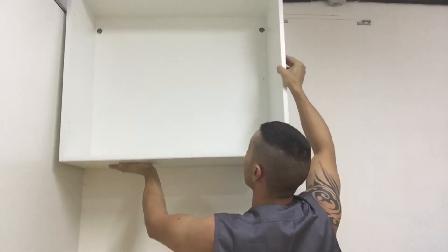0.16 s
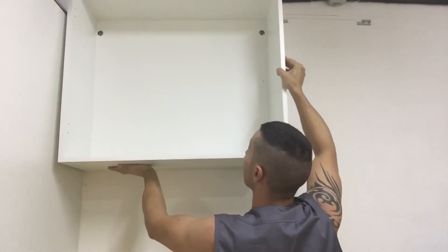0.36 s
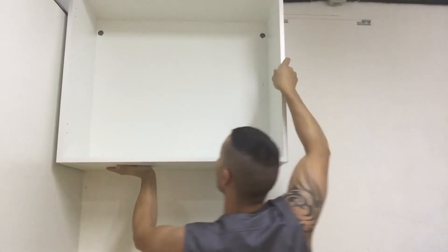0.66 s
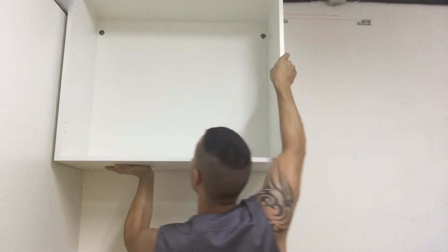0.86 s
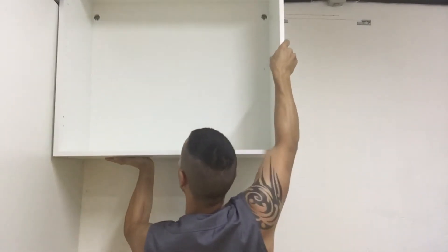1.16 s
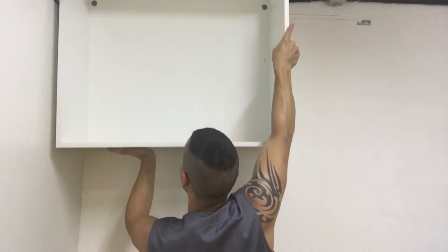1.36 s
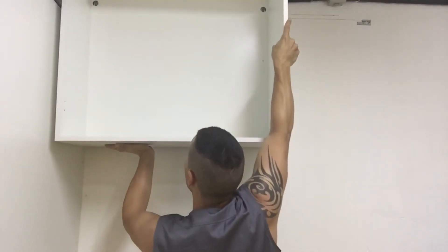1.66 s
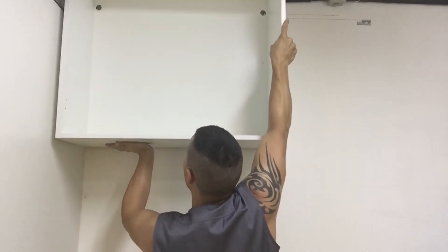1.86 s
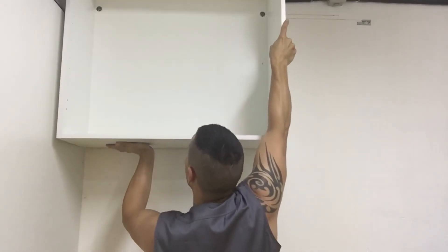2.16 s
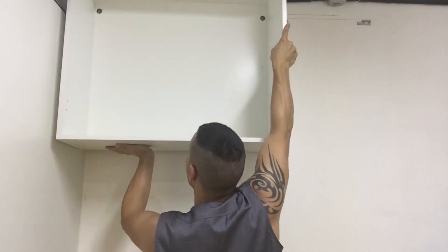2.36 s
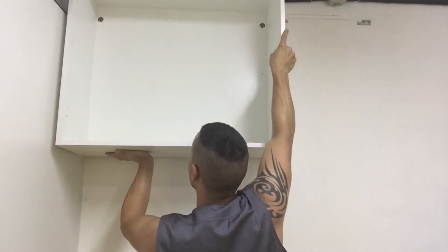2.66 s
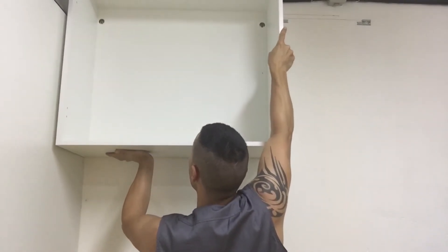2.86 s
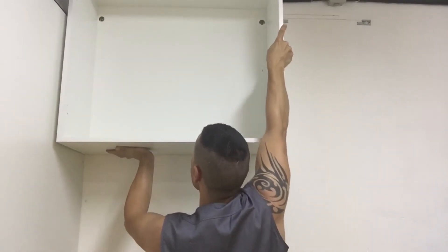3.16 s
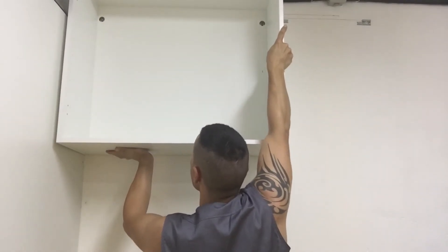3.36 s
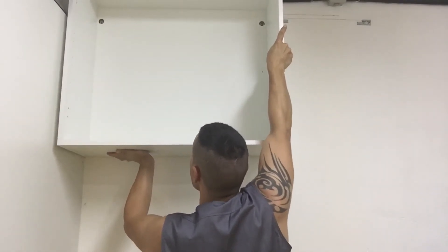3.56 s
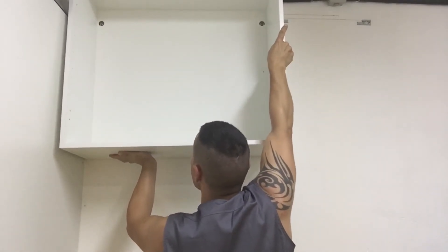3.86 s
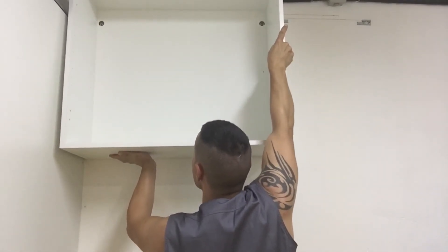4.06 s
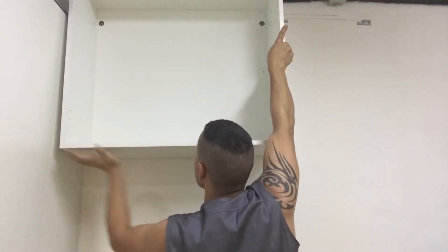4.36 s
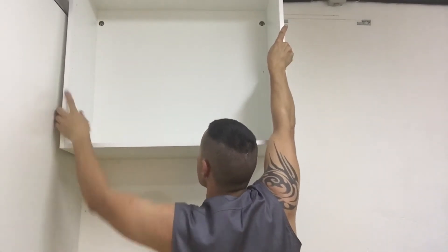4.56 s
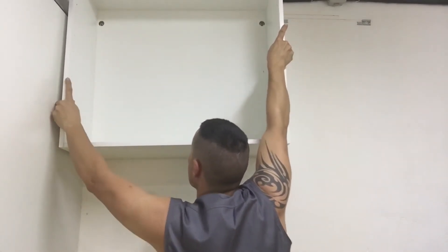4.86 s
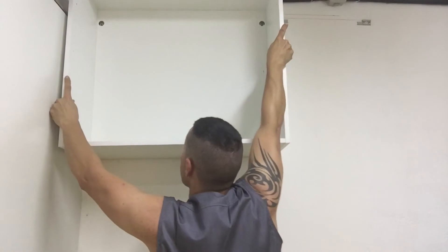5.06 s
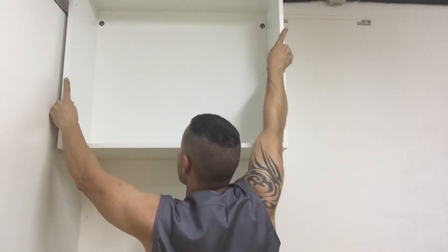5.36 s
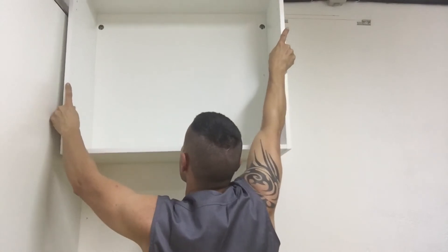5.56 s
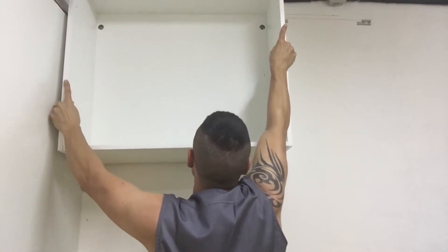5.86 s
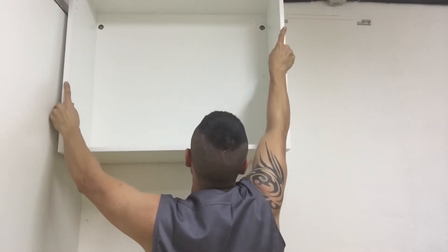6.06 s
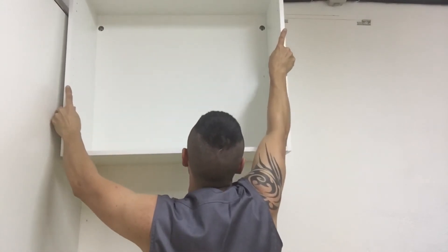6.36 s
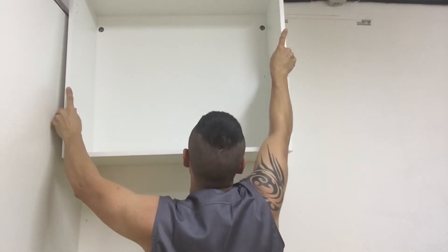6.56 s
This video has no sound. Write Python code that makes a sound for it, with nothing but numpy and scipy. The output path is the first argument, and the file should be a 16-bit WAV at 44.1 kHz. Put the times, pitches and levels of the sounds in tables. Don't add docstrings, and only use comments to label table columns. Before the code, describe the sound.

Irregular wooden knocks boom through an empty cabinet being worked onto its wall mounts, with brief scrapes, tiny metal clinks and faint fan hum between.

```python
import sys
import numpy as np
from scipy import signal
from scipy.fft import rfft, irfft
from scipy.io import wavfile
from scipy.ndimage import uniform_filter1d

SR = 44100
rng = np.random.default_rng(int(sys.argv[2]) if len(sys.argv) > 2 else 0)


def put_to_file(sound):
    columns = np.atleast_2d(sound).T
    safe = np.clip(columns, -1, 1)
    whole_steps = np.round(safe * 32767)
    wavfile.write(sys.argv[1], SR, whole_steps.astype(np.int16))


def natural_amplitude(level_db):
    exponent = np.asarray(level_db, float) / 20
    return 10 ** exponent


N = 296793

# pitch_hz, level_db, t60_s
WALL_MODES = [(51.7, -18, 0.24), (60.6, 9, 0.37)]
BACK_MODES = [(101.8, 0.96, 0.18), (129.4, 0.67, 0.33), (160, -0.24, 0.22)]
SIDE_MODES = [(185.7, -3, 0.12), (210.9, -3, 0.18), (240, -4.5, 0.12)]
BOX_MODES = [(272.3, -6, 0.16), (318.5, 0, 0.16), (358.6, -7, 0.15), (417.4, -10, 0.14)]
RISE_TIMES = [0.025, 0.0038, 0.0054, 0.0023]
# start_s, cabinet_db, wall_db, spot_turns (round the frame)
KNOCKS = [(0.0, -27, -49, 0.14), (0.064, -12, -23, 0.57), (0.129, -19.5, -23, 0.77),
          (0.209, -20.5, -24.5, .33), (0.695, -19, -25.5, 0.41), (1.423, -22, -24, .1),
          (1.469, -27.5, -23, 0.033), (1.898, -16, -24.5, 0.4), (1.929, -17, -43, 0.25),
          (1.969, -19.5, -28, 0.5), (2.668, -11.5, -33, 0.54), (2.698, -25.5, -27, 0.49),
          (2.752, -27, -48, 0.72), (2.975, -23, -27.5, 0.25), (3.806, -28, -40, 0.16),
          (5.187, -23.5, -39, 0.16), (5.259, -28, -31, 0.45), (5.374, -16, -39, 0.7),
          (5.488, -24.5, -36.5, 0.4), (5.521, -27.5, -38, 0.89), (6.136, -17, -29, 0.67),
          (6.27, -40, -45, 0.59)]
# start_s, cabinet_db, wall_db, spot_turns
NUDGES = [(0.581, -42, -48, 0.77), (0.779, -35, -63, 0.34), (1.059, -39.5, -50, 0.53),
          (1.833, -51, -69, .02), (2.274, -39.5, -71, 0.87), (2.343, -35.5, -35, 0.22),
          (2.899, -35, -49, 0.71), (3.03, -58, -69, .02), (3.198, -47.5, -64, .01), (3.352, -71, -64, 0.42),
          (3.472, -35, -45, 0.068), (3.537, -38.5, -41, 1), (3.609, -41.5, -43, 0.14),
          (3.87, -42, -44, 0.67), (4.521, -49, -56, 0.33), (4.68, -46, -47, 0.9), (4.829, -45.5, -57, 0.92),
          (5.048, -46, -48.5, 0.29), (5.721, -37.5, -37, 0.18), (5.953, -43.5, -41.5, .92),
          (6.448, -39.5, -42.5, 0.89), (6.52, -48, -58, 0.68)]
# start_s, level_db, mid_share_db, high_share_db, contact_ms
CRACKS = [(0.0, -23, -11.5, -13, 2.7), (0.055, -5, -8, -18, 3), (0.084, -11, -35, -32, 3.5),
          (0.679, -24.5, -7, -19.5, 11.7), (1.417, -19.5, -4.5, -22.5, 1.33),
          (1.89, -17.5, -10, -19.5, 5.7), (1.915, -12.5, -17, -26, 14), (2.262, -36.5, -7, -23, 16),
          (2.664, -12, -9, -13.5, 4.7), (2.722, -11.5, -10.5, -25, 15.3), (2.98, -33, -14, -18.5, 8),
          (3.022, -32.5, -0.5, -23, 10), (3.537, -34.5, -3, -14, 6.8), (3.565, -35, -2, -33, 18),
          (3.606, -31, -6, -23, 3.1), (3.796, -29.5, -7.5, -18, 9.1), (5.18, -28.5, -8, -25, 6),
          (5.256, -22.5, -9.5, -17.5, 5.8), (5.284, -29, -4, -12.5, 5.4), (5.349, -27.5, -4, -7, 1.1),
          (5.38, -19, -22, -24, 7), (5.479, -29.5, 0, -9, 6.9), (6.131, -20.5, -8, -23, 3.3),
          (6.142, -19.5, -41, -22, 2.8)]
# start_s, level_db, mid_share_db, high_share_db, contact_ms
SCUFFS = [(0.555, -34.5, -8.5, -16, 22), (0.617, -55, 3, 11, 5), (1.054, -37, -8.5, -23, 13),
          (1.82, -41.5, 1, -16, 44), (2.51, -38.5, -10, -26, 14), (3.205, -61.5, -18, -0.5, 8),
          (3.404, -50, 7, -34, 2), (3.46, -40, -11, -27, 8), (4.169, -56.5, -6, -7, 22),
          (4.327, -54.5, 5, 0, 2.5), (4.49, -47, 0, -18, 16), (4.53, -47, -3, -11, 27),
          (4.686, -43.5, 9, -15, 12), (4.886, -62, -3, 11.5, 10), (4.91, -76, -8, 16, 12),
          (5.048, -38.5, -14, -22.5, 3), (5.515, -37.5, -3, -20, 8), (5.95, -58.5, -14, -4.5, 4.5),
          (6.385, -43.5, -22, -37, 22), (6.44, -39, -4, -33, 18.3)]
# pitch_hz, width_hz, level_db
BOARD_MODES = [(432, 12, 10.5), (570, 26, 9), (700, 56, 1.5), (830, 44, 5), (962, 17, 0), (1076, 65, 4.5),
               (1270, 25, -0.5), (1420, 78, -3), (1630, 27, 9), (2080, 22, -23), (2290, 88, -2),
               (3060, 170, -3.5), (3430, 110, -2)]
# start_s, pressure_db, sliding_db
DRAG = [(0.0, -17, -62), (0.3, -23, -56), (0.42, -37.5, -56), (0.67, -34.5, -40), (0.9, -38.5, -67),
        (1.5, -46, -50.5), (1.93, -45, -48.5), (2.1, -53, -62.5), (2.58, -42, -46.5), (2.72, -24, -35),
        (2.94, -40, -47.5), (3.26, -53.5, -55.5), (3.6, -37, -55), (4.05, -52, -58.5), (5.16, -47.5, -56.5),
        (5.38, -27.5, -36.5), (5.8, -49.5, -52), (6.73, -49.5, -58.5)]
# start_s, level_db, pitch_hz, t60_s
FITTINGS = [(0.0557, -20.5, 2490, .03), (0.056, -19, 3450, 0.027), (0.062, -18.5, 1215, 0.12),
            (1.416, -26, 1382, 0.049), (1.4185, -34, 1960, 0.042), (1.419, -31.5, 2480, .035),
            (1.4194, -29, 3180, 0.029), (1.846, -54, 3520, 0.21), (2.665, -32, 3930, 0.032),
            (3.031, -36.5, 897, .065), (3.0328, -38, 1690, .075), (3.408, -52, 842, 0.26),
            (3.612, -47.5, 5750, .035), (3.814, -49, 4340, .11), (3.861, -59, 5900, .14),
            (4.6847, -47.5, 970, 0.088), (4.687, -42, 1905, .11), (4.688, -54.5, 5200, .055),
            (4.689, -57, 6900, .085), (4.6895, -44, 2680, .045), (5.0465, -52, 2330, .065),
            (5.0485, -47, 1585, .075), (5.288, -32, 2150, .025), (5.3495, -28.5, 6150, 0.027),
            (5.3515, -37, 3720, .025), (5.483, -38, 2680, 0.051), (5.486, -53.5, 6860, .28),
            (5.571, -49, 1333, .16), (5.651, -52, 1350, 0.48), (5.66, -49, 2780, 0.23)]
# frequency_hz, level_db (per Hz)
AIR_SPECTRUM = [(18, -65), (30, -7), (71, 2), (106, -4), (157, 2.5), (303, -13), (364, -13), (473, -6),
                (844, -12), (962, -15), (1430, -16), (2120, -20), (3400, -17), (4780, -45), (16000, -34)]
# frequency_hz, t60_s
ROOM_DECAY = [(60, 0.68), (200, 0.56), (600, 0.61), (1500, 0.62), (3000, 0.5), (6000, 0.69), (9000, 0.5),
              (14000, 0.57)]
# frequency_hz, level_db
MICROPHONE = [(3000, 0), (7000, -1.5), (7700, -2.5), (8500, 1.5), (9300, 0), (10000, -4), (10800, -1.5),
              (13500, -3.5), (15300, -5), (15900, -28), (17000, -62)]

HOME_TURNS, NEAR_DB = np.arange(3) / 3, 4.5
CRACK_TOP_DB, SCUFF_TOP_DB = -11.5, -5.5
TOP_FOLLOWS = 1.055
TICK_DB, TICK_LOSS_DB = 17.5, 5.5
SMEAR_S, CLUMP_DB = 0.012, 4.0
HISS_DB, HISS_FOLLOWS = -26.0, 0.88
AIR_DB, HUM_DB = -58, -52.5
HUM_HZ, HUM_WIDTH_HZ, HUM_WAVER = 101, 5, 0.3
LENGTH = 32768


def bumps():
    slow = 16
    room = signal.resample_poly(rooms(0.75), 1, slow, axis=1)
    out = np.zeros(N // slow + 1)
    t = np.arange(LENGTH // slow) * slow / SR
    blows = sorted(KNOCKS + NUDGES)
    luck = rng.random((len(blows), 4, 4, 3))
    parts = (WALL_MODES, BACK_MODES, SIDE_MODES, BOX_MODES)
    for k, (start_s, cabinet_db, wall_db, spot) in enumerate(blows):
        panels_db = cabinet_db + NEAR_DB * np.cos(2 * np.pi * (spot - HOME_TURNS))
        for modes, rise_s, part_db, chance in zip(parts, RISE_TIMES, [wall_db, *panels_db], luck[k]):
            ring = np.zeros(len(t))
            for (hz, level_db, t60_s), (a, b, turns) in zip(modes, chance):
                decay = natural_amplitude(level_db + 5.2 * (a - 0.5) - 60 * t / t60_s)
                pitch_hz = hz * (1 + 0.052 * (b - 0.5))
                ring += decay * np.sin(2 * np.pi * (pitch_hz * t + turns))
            ring *= 1 - np.exp(-t / rise_s)
            ring = signal.fftconvolve(ring, room[k % len(room)])[:len(t)]
            add(out, (start_s - 0.003) / slow, natural_amplitude(part_db - 10.0) * evened(ring, count=250))
    return signal.resample_poly(out, slow, 1)[:N]


def cracks():
    out, t = np.zeros(N), np.arange(4096) / SR
    room = rfft(rooms(0.75, count=8), LENGTH)
    hits = sorted([(*row, CRACK_TOP_DB) for row in CRACKS] + [(*row, SCUFF_TOP_DB) for row in SCUFFS])
    grit = rng.standard_normal((len(hits), 2, len(t)))
    luck = rng.random((len(hits), len(BOARD_MODES), 2))
    hz = np.fft.rfftfreq(LENGTH, 1 / SR)
    for k, (start_s, level_db, mid_db, high_db, contact_ms, top_db) in enumerate(hits):
        contact_s = max(contact_ms, 0.5) / 1000
        tick = natural_amplitude(TICK_DB - TICK_LOSS_DB * np.log2(contact_s * 1000)) * np.exp(-t / 0.0018)
        smear = np.exp(-t / (SMEAR_S + contact_s)) * (1 - np.exp(-t / contact_s))
        clumps = natural_amplitude(CLUMP_DB * evened(uniform_filter1d(grit[k, 1], 130)))
        burst = rfft(grit[k, 0] * (tick + smear * clumps))
        burst = irfft(burst / abs(burst)) * (t < 0.085)
        slope = [(250, -22.0), (450, -2.5), (900, -7.5), (2500, mid_db - 6.0),
                 (6000, high_db - 4.5), (12000, top_db + TOP_FOLLOWS * high_db)]
        board = 1
        for (mode_hz, width_hz, mode_db), (a, b) in zip(BOARD_MODES, luck[k]):
            detuned_hz = mode_hz * (1 + 0.15 * (b - 0.5))
            board = board + natural_amplitude(mode_db + 21.0 * (a - 1.0)) / (1 + 2j * (hz - detuned_hz) / width_hz)
        heard = rfft(burst, LENGTH) * causal(read(slope, hz)) * board * room[k % len(room)]
        add(out, start_s, natural_amplitude(level_db + 34.0) * irfft(heard))
    return out


def drag():
    start_s, *controls_db = np.transpose(DRAG)
    press_db, slide_db = (np.interp(np.arange(N) / SR, start_s, db) for db in controls_db)
    unevenness = evened(uniform_filter1d(rng.standard_normal(N), 900))
    grains = rng.standard_normal(N) * natural_amplitude(2.24 * unevenness)
    shake = sum(natural_amplitude(db) * band(grains, hz * 0.93, hz * 0.943, order=1)
                for hz, db, _ in BACK_MODES + SIDE_MODES + BOX_MODES)
    rumble = natural_amplitude(press_db) * evened(shake)
    scrape = natural_amplitude(slide_db) * evened(band(grains, 430, 3180))
    hiss = natural_amplitude(HISS_DB + HISS_FOLLOWS * slide_db) * evened(band(grains, 1900, 11300))
    return rumble + scrape + hiss


def clinks():
    dry, t = np.zeros(N), np.arange(8192) / SR
    for start_s, level_db, hz, t60_s in FITTINGS:
        pair = np.sin(2 * np.pi * hz * t) + 0.92 * np.sin(2 * np.pi * hz * 1.024 * t)
        onset = 1 - np.exp(-t / 0.00037)
        add(dry, start_s, natural_amplitude(level_db - 60 * t / t60_s) * pair * onset)
    return signal.fftconvolve(dry, 0.5 * rooms(1.34, count=1)[0])[:N]


def air():
    hz = np.fft.rfftfreq(N, 1 / SR)
    low_cut = 1 + (95 / (hz + 1)) ** 6
    hiss = irfft(rfft(rng.standard_normal(N)) * natural_amplitude(read(AIR_SPECTRUM, hz)) / low_cut, N)
    waver = irfft(rfft(rng.standard_normal(N)) / (1 + ((hz - HUM_HZ) / HUM_WIDTH_HZ) ** 2), N)
    hum = np.sin(2 * np.pi * HUM_HZ * np.arange(N) / SR) + HUM_WAVER * evened(waver)
    return natural_amplitude(AIR_DB) * evened(hiss) + natural_amplitude(HUM_DB) * evened(hum)


def rooms(direct, count=5):
    taps = np.zeros((count, LENGTH))
    slots = np.arange(160, LENGTH - 20, 20)
    at = slots + rng.integers(0, 20, (count, len(slots)))
    np.put_along_axis(taps, at, rng.choice([-1., 1.], at.shape), 1)
    hz, t, z = signal.stft(taps, SR, nperseg=512)
    decay = natural_amplitude(-60 * t / read(ROOM_DECAY, hz)[:, None])
    tail = signal.istft(z * decay, SR, nperseg=512)[1][:, :LENGTH]
    tail[:, :160] = 0
    tail *= 1 + 0.94 * np.exp(-np.arange(LENGTH) / SR / 0.035)
    tail /= np.linalg.norm(tail, axis=1, keepdims=True)
    tail[:, 0] = direct
    return tail


def causal(gain_db):
    quefrency = irfft(np.log(natural_amplitude(np.maximum(gain_db, -100))))
    half = len(quefrency) // 2
    quefrency[1:half] *= 2
    quefrency[half + 1:] = 0
    return np.exp(rfft(quefrency))


def band(x, lo_hz, hi_hz, order=2):
    return signal.sosfilt(signal.butter(order, [lo_hz, hi_hz], "band", fs=SR, output="sos"), x)


def evened(x, count=None):
    return x / np.sqrt(np.mean(x[:count] ** 2) + 1e-20)


def read(points, hz):
    f, value = np.transpose(points)
    return np.interp(np.log(hz + 1), np.log(f + 1), value)


def add(mix, start_s, sound):
    part = mix[max(round(start_s * SR), 0):][:len(sound)]
    part += sound[:len(part)]


def scene():
    mix = bumps() + cracks() + natural_amplitude(-10.5) * drag() + clinks() + air()
    return mix[None]


def low_pass(x):
    return signal.sosfilt(signal.butter(12, 15830, fs=SR, output="sos"), x)


def record(dry):
    overloaded = 1.67 * np.tanh(dry / 1.068)
    cut = signal.sosfilt(signal.butter(2, 45, "high", fs=SR, output="sos"), overloaded)
    colour = irfft(causal(read(MICROPHONE, np.fft.rfftfreq(1024, 1 / SR))))
    mix = signal.oaconvolve(cut, colour[None])[:, :N]
    return low_pass(mix)


dry = scene()
out = record(dry)
put_to_file(out)
```